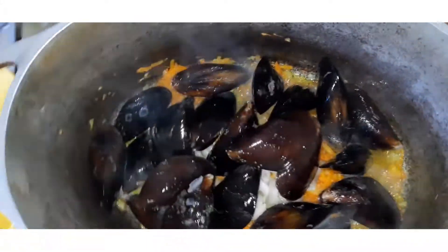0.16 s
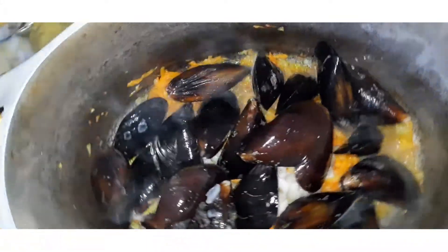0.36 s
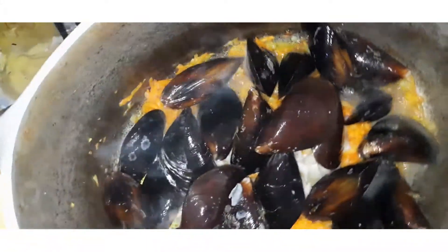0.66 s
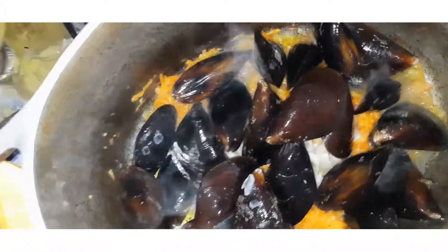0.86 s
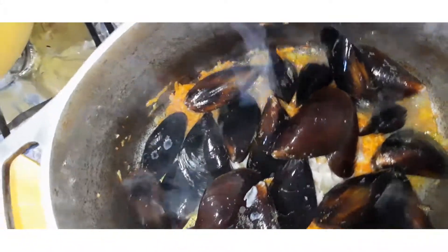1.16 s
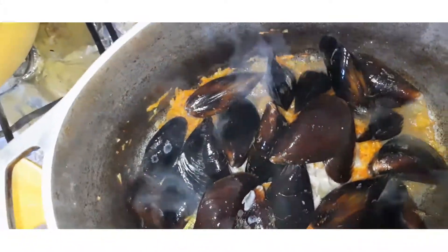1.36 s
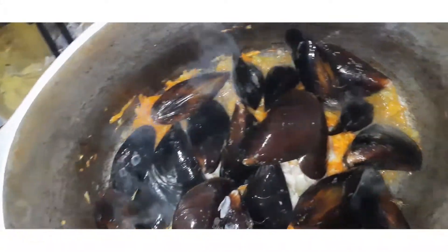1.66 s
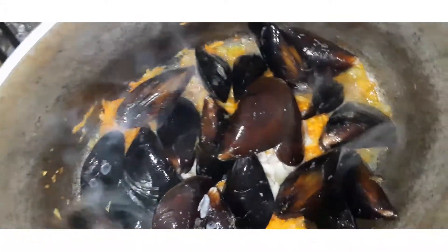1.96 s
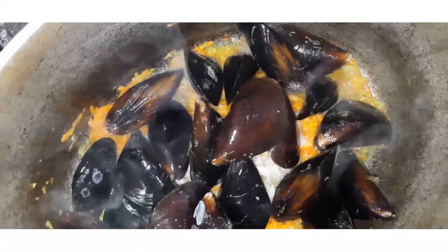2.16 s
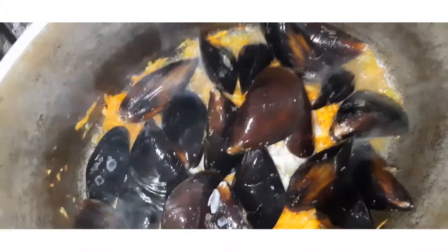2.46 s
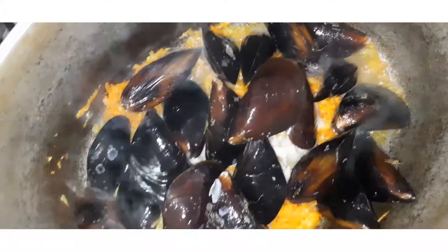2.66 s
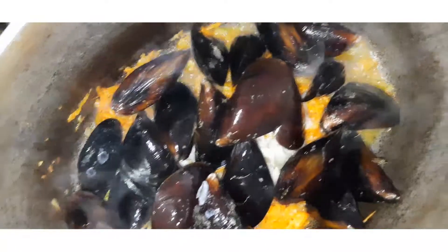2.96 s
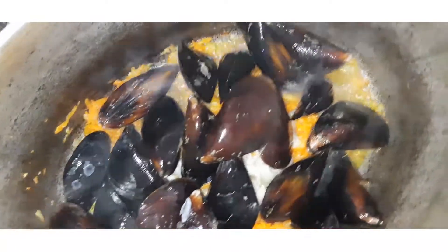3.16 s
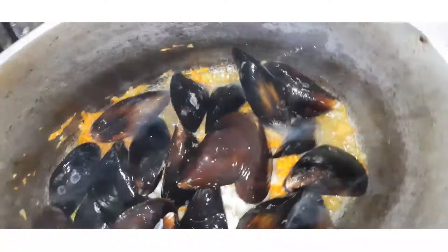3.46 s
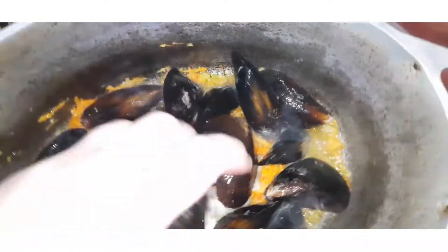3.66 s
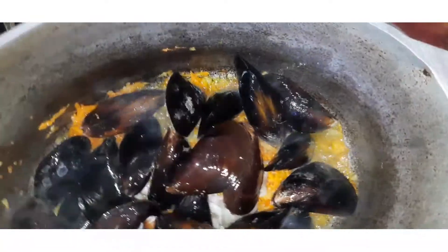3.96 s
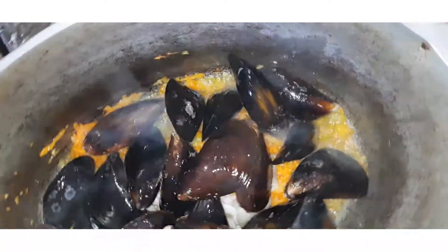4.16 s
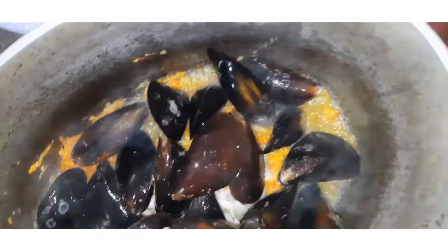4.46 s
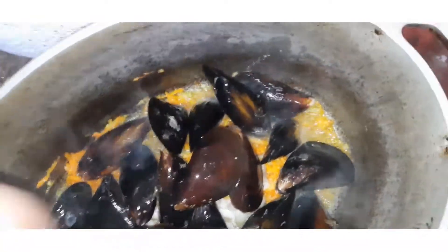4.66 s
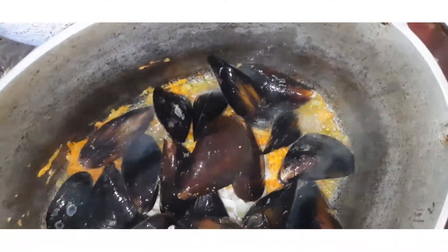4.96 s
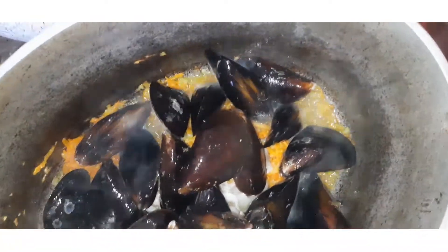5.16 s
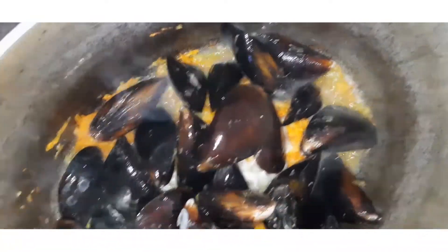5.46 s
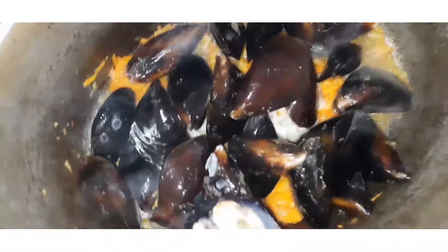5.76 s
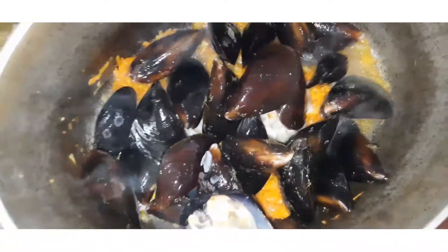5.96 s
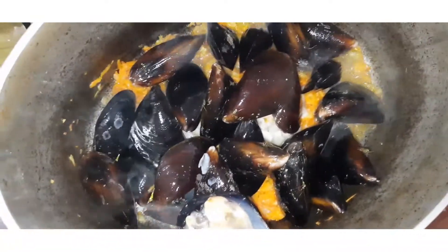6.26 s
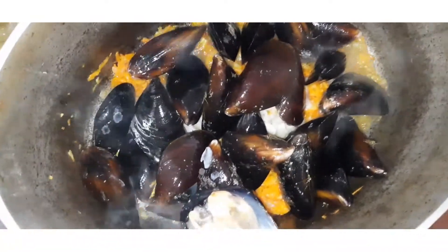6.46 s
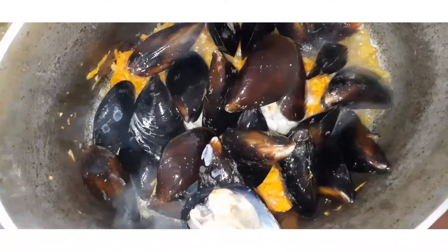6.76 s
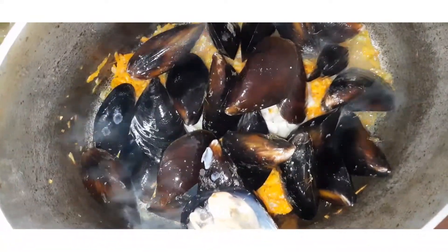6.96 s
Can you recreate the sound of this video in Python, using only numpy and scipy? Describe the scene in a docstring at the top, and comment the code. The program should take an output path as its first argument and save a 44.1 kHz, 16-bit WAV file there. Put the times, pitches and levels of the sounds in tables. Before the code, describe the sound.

Dense bright frying crackle swells slightly then holds, punctuated by sharp shell snaps, low knocks and shuffling beside the stove, and a brief metallic clink.

```python
"""Mussels frying in a deep pot

Mussels fry in hot oil in a deep metal pot, heard from just above the rim.
Random bubble bursts, thicker in each spurt of leaking juice, make crackle, hiss and fizz; clustered modes click as shells.
Beside the stove, pulses with rumble knock, swelling grains shuffle, and decaying modes clink as a utensil.
Low filtered noise is the gas flame underneath."""
import sys
import numpy as np
from scipy import signal
from scipy.fft import rfft, irfft
from scipy.io import wavfile

SR = 44100
rng = np.random.default_rng(int(sys.argv[2]) if len(sys.argv) > 2 else 0)


def store_wav(level_fs):
    """Save 16-bit WAV to argv[1]."""
    pcm = np.round(np.clip(np.atleast_2d(level_fs), -1, 1) * 32767)
    wavfile.write(sys.argv[1], SR, pcm.T.astype(np.int16))


N = 313110
TIME = np.arange(N) / SR  # s

# vigour of the frying, building up as the shells leak juice, then settling: (time [s], relative level [dB])
FRYING_VIGOUR = [(0, -27), (0.7, -25.5), (1.3, -24), (1.9, -22), (3.15, -22.5), (3.4, -23), (4.4, -22.5),
                 (6.2, -23), (7.1, -22.5)]
# colour of the sizzle out of the pot: (frequency [Hz], relative left [dB per Hz], relative right [dB per Hz])
SIZZLE_COLOUR = [(269, -24.5, -24), (540, -12, -12.5), (810, -6.5, -10.5), (1180, -13.7, -8),
                 (1513, -12, -9.5), (1970, -6.5, -1), (2820, -2, 2.5), (3810, -9.5, -9), (4430, -10, -7.5),
                 (6860, -14, -2.5), (8580, -12, -6.5), (9860, -12.5, -13.5), (11840, -9, -7.5),
                 (15700, -10.5, -13.5)]
# resonances of the pot that the sizzle keeps ringing: (frequency [Hz], width [Hz], relative level [dB])
POT_RESONANCES = [(1527, 187, 3), (2700, 6, -16)]
# brief dips in the level of the sizzle: (time [s], depth [dB])
SIZZLE_DIPS = [(2.51, 3.5), (5.12, 2.5), (6.25, 5)]
DIP_S = 0.02
BURSTS_PER_S, SPURTS_PER_S = 14000, 45
# the crackle of the bigger bubbles: level at mean vigour, share of the vigour's swing that it follows
CRACKLE_DB, CRACKLE_FOLLOWS = -26, 0.84

# shell clicks and spits of oil: (time [s], level [dB], pitch [Hz], t60 [s], left minus right [dB])
SHELL_CLICKS = [(1.342, -10, 2800, 0.034, -7), (1.343, -18, 890, 0.13, 5), (1.386, -18, 2700, .06, -6),
                (1.462, -17, 2910, 0.058, -5), (1.459, -19.5, 860, 0.048, 13),
                (1.817, -18.5, 2480, .05, -9), (3.447, -16, 7300, 0.02, -10),
                (3.7328, -4.5, 1300, 0.0033, -1), (3.747, -9.5, 2330, .008, -6),
                (3.758, -16.5, 950, 0.043, 0), (3.813, -16.5, 520, 0.018, -2),
                (4.826, -13, 2330, 0.016, -15), (4.84, -20, 1490, 0.069, -2), (5.432, -14.5, 2180, .03, -2),
                (6.223, -9.5, 2500, 0.018, 5)]

# the utensil touches down and rebounds: (time [s], strength [dB])
UTENSIL_TOUCHES = [(4.912, -13.5), (4.938, -28), (4.963, -26), (5.006, -29), (5.058, -33)]
# modes of the utensil: (frequency [Hz], relative level [dB], t60 [s])
UTENSIL_MODES = [(321, -20, 0.27), (776, -13.5, 0.2), (1200, -21, 0.35), (2050, -9, 0.16),
                 (2650, -14, 0.21), (2767, -10, 0.5), (2814, -8, 0.19), (3435, -11, 0.2), (3550, -12, .16),
                 (3800, -5, 0.046), (4100, -5, .06), (4400, -9, .06), (5740, -13, 0.055), (6030, 0, 0.063)]

# dull knocks: (time [s], level of the push [dB], pitch of the contact [Hz], share of ring and rumble [factor])
DULL_KNOCKS = [(0.492, -28, 330, 0.75), (0.727, -30, 400, 0.73), (1.345, -19.5, 274, 2.3),
               (1.460, -21, 300, 1.5), (1.486, -19, 236, 1.9), (1.570, -19.5, 203, 1.75),
               (1.817, -23.5, 447, 1.8), (2.1697, -2.5, 384, 0.61), (2.173, -19, 135, 1.2),
               (2.2281, -9, 380, 0.64), (2.905, -19, 390, .67), (3.163, -24.5, 300, 1.7),
               (3.294, -11, 493, 2.1), (3.301, -11, 326, .9), (3.317, -7, 280, 0.89),
               (3.331, -13, 480, 0.49), (3.346, -22, 135, 1.4), (3.360, -11, 367, 0.94),
               (4.108, -15.5, 280, 0.8), (5.186, -13.5, 620, 0.54), (5.369, -13, 422, 0.49),
               (5.433, -19.5, 420, 1.2), (5.707, -12, 427, 1.15), (5.765, -19, 378, 1.1),
               (6.045, -13.5, 480, 0.96), (6.083, -8, 427, 1.04), (6.861, -18, 424, 1.2),
               (6.957, -15.5, 322, 0.71), (7.026, -16, 272, 2), (7.071, -10.5, 360, 1.2)]
# what a knock sets ringing: (frequency [Hz], relative level [dB])
STRUCK_MODES = [(195, 4.5), (267, 11.5), (404, 5)]

# something is slid about beside the stove: (start [s], length [s], level [dB])
SLIDING = [(0.465, 0.29, -45.5), (1.4, 0.15, -34.5), (1.804, 0.54, -42.5), (2.58, .2, -46),
           (2.886, 0.23, -45), (5.137, 0.062, -36), (5.306, 0.21, -34), (5.668, 0.14, -30.5),
           (5.945, .17, -32.5), (6.365, 0.27, -45.5), (6.75, 0.25, -33)]
SLIDE_ATTACK_S, SLIDE_RELEASE_S, BUMPS_PER_S = 0.047, 0.051, 35
# the low murmur of the kitchen under the slides: its level at first, and once the frying has built up
QUIET_START_DB, QUIET_DB, QUIET_RISE_S = -48, -42.5, 1.4

# colour of knocks and shuffling in the kitchen: (frequency [Hz], relative level [dB per Hz])
KITCHEN_COLOUR = [(25, -50), (60, -19.5), (120, -5.5), (220, -9.5), (300, -7.5), (500, 4), (800, 0),
                  (1200, -9), (2500, -12), (6000, -73)]
# low resonances around the stove: (frequency [Hz], width [Hz], relative level [dB])
STOVE_BOOMS = [(200, 10, -2), (267.4, 14.7, 12), (403.3, 15, 3)]
KITCHEN_T60_S = 0.4

# the gas flame under the pot is steady and flutters once
FLAME_DB, FLUTTER_S, FLUTTER_LENGTH_S, FLUTTER_DB = -60, 4.85, 0.037, -47
CUTOFF_HZ = 15780


def sizzle(hiss_db=3.0, finest_db=-1.0, ping_db=-8.5):
    """Big bubbles crackle, small ones hiss, the finest spray fizzes on top; each size has its own spurts."""
    hz, left_db, right_db = np.transpose(SIZZLE_COLOUR)
    ringing = from_db(ping_db) * pings()

    def band(burst, edges_hz):
        """One size of bubble, with the pings in its range, coloured for each ear."""
        band_pass = signal.butter(6, edges_hz, "band", fs=SR, output="sos")
        left, right = signal.sosfilt(band_pass, burst + ringing)
        return np.array([colour(left, hz, left_db), colour(right, hz, right_db)])

    big = bubbles(spread_db=3.5, spurt_depth=0.16, pot_echo_db=-2.0)
    crackle = band(big + resonate(big[0], POT_RESONANCES), [200, 3400])

    small = bubbles(spread_db=3.5, spurt_depth=0.28, pot_echo_db=-1.0)
    finest = bubbles(spread_db=5.5, spurt_depth=0.26, pot_echo_db=1.5)
    hiss = band(small, [3400, 9000]) + from_db(finest_db) * band(finest, [9000, 19000])

    vigour_db, = in_time(FRYING_VIGOUR)
    crackle_db = CRACKLE_DB + CRACKLE_FOLLOWS * (vigour_db - vigour_db.mean())
    return from_db(hiss_db + vigour_db) * rms_one(hiss) + from_db(crackle_db) * rms_one(crackle)


def bubbles(spread_db, spurt_depth, pot_echo_db):
    """Bursting bubbles, thicker in each spurt; the pot's walls scatter each burst in a different way."""
    bursts_per_s = BURSTS_PER_S * spurts(spurt_depth, t60=0.075)
    direct = grains(bursts_per_s, spread_db, lag_ms=0.45)
    fade = dying(t60=0.022)[1]
    lingering_power = np.abs(signal.oaconvolve(direct[0] ** 2, fade / fade.sum())[:N])
    scattered = np.sqrt(lingering_power) * rng.standard_normal((2, N))
    return rms_one(direct + from_db(pot_echo_db) * scattered)


def spurts(depth, t60):
    """Each drop of juice that meets the oil flares up at once and dies away; mean 1."""
    drops = (rng.random(N) < SPURTS_PER_S / SR) * rng.exponential(1, N)
    flare = signal.fftconvolve(drops, dying(t60)[1])[:N]
    flow = 1 + depth * np.maximum(flare, 0) / flare.mean()
    return flow / flow.mean()


def pings(t60=0.089, spread_db=1.0, count=4200):
    """Some bubbles ring briefly in the hollow of a shell, each at a pitch of its own; rms 1."""
    t, fade = dying(t60)
    when, pitch, size, phase = rng.random((4, count, 1), dtype=np.float32)
    at = ((when * N).astype(int) + np.arange(len(t))).ravel()
    # pitches spread over the decade from 1400 Hz
    turn = 2 * np.pi * 1400 * 10 ** pitch * t.astype(np.float32)
    strength = from_db(-spread_db * np.log(size + 1e-9)) * fade
    # the ears hear each ping at a different phase
    ears = [np.sin(turn + lag) * strength for lag in (0, 2 * np.pi * phase)]
    return rms_one(np.array([np.bincount(at, ear.ravel(), N)[:N] for ear in ears]))


def shell_clicks(crack_db=-13, room_db=-9, cluster=0.11, count=5):
    """A short crack, then a cluster of close, quickly damped modes that builds up within a cycle."""
    out = np.zeros((2, N))
    for s, db, hz, t60, pan_db in SHELL_CLICKS:
        t, fade = dying(t60)
        offsets = np.linspace(-1, 1, count) + rng.uniform(-0.35, 0.77, count)
        modes_hz = hz * (1 + cluster * offsets)
        phases = rng.uniform(-1.77, 2.4, (count, 1))
        ring = np.cos(2 * np.pi * np.outer(modes_hz, t) + phases).sum(axis=0) / np.sqrt(count)
        build_up = 1 - np.exp(-2 * hz * t)
        # the crack dies three times as fast as the ring
        crack = from_db(crack_db) * rng.standard_normal((2, len(t))) * fade ** 3
        add(out, s, (ring * fade * build_up + crack) * from_db(db) * pan(pan_db))
    return out + from_db(room_db) * reverberate(out, t60=0.12)


def clink(room_db=-5, crack_db=2, crack_t60=0.05, pan_db=-5.0):
    """A hard touch and a few light rebounds: each cracks and sets the utensil's modes ringing."""
    out = np.zeros((2, N))
    crack_fade = dying(crack_t60)[1]
    for s, blow_db in UTENSIL_TOUCHES:
        noise = crack_fade * rng.standard_normal((2, len(crack_fade)))
        crack = resonate(resonate(noise, [(4000, 2400, 0)]), [(4000, 4300, 0)])
        add(out, s, from_db(blow_db + crack_db) * crack)
        for hz, db, t60 in UTENSIL_MODES:
            t, fade = dying(t60)
            phases = rng.uniform(-0.61, 1, (2, 1))
            build_up = 1 - np.exp(-hz * t)
            ring = np.cos(2 * np.pi * hz * t + phases) * build_up
            add(out, s, from_db(blow_db + db) * fade * ring)
    return (out + from_db(room_db) * reverberate(out, KITCHEN_T60_S)) * pan(pan_db)


def knocks(rumble_db=-7.0, rumble_t60=0.4, contact_db=-1.0, ring_db=-18.5, ring_t60=0.29,
           uneven_db=2.5, mismatch_db_per_octave=16, rattle_db=-10, rattle_hz=2000):
    """A soft blow pushes air and rebounds; modes near its pitch ring, the room rumbles, shells rattle faintly."""
    direct, rumble = np.zeros(N), np.zeros((2, N))
    lead = 0.005  # s from the start of the pulse to its peak
    t, fade = np.arange(-lead, lead, 1 / SR), dying(rumble_t60)[1]
    after, ring = dying(ring_t60)
    modes_hz, modes_db = np.transpose(STRUCK_MODES)
    modes = ring * np.sin(2 * np.pi * np.outer(modes_hz, after))
    for s, db, hz, share in DULL_KNOCKS:
        u = (np.pi * hz * t) ** 2
        push = (2 * u - 1) * np.exp(-u)
        add(direct, s - lead, from_db(db) * push)

        # modes far from the contact's pitch are excited less
        mismatch_db = mismatch_db_per_octave * np.abs(np.log2(modes_hz / hz))
        excited_db = modes_db - mismatch_db + uneven_db * rng.standard_normal(len(modes))
        add(direct, s, share * from_db(db + ring_db + excited_db) @ modes)

        scatter = rng.standard_normal((2, len(fade)))
        scatter = scatter + resonate(scatter, [(hz, hz, contact_db)])
        add(rumble, s, from_db(db + rumble_db) * share * fade * scatter)
    rattle = from_db(rattle_db) * resonate(rumble, [(rattle_hz, 1600, 0)])
    return direct + low_room(rumble, width=0.53) + rattle


def shuffling(body_hz=270, body_width_hz=100, body_db=3, bump_db=-4):
    """Dense slips on a hollow body, heard through the room; each slide swells them and adds bumps."""
    def through_body(touches):
        """The hollow body and then the room ring with the touches; rms 1."""
        body = resonate(touches, [(body_hz, body_width_hz, body_db)])
        return rms_one(low_room(touches + body, width=0.54))

    shared = [[1], [0]]  # keeps one channel of grains as the part common to both ears
    noise = 0.47 * rng.standard_normal((2, N))
    slips = through_body(grains(900, spread_db=1.5, lag_ms=0.2) * shared + noise)
    bumps = through_body(grains(BUMPS_PER_S, spread_db=1.5, lag_ms=0.2) * shared)
    effort = sum(from_db(db) * swell(s, length, SLIDE_ATTACK_S, SLIDE_RELEASE_S)
                 for s, length, db in SLIDING)
    quiet = from_db(np.interp(TIME, [0, QUIET_RISE_S], [QUIET_START_DB, QUIET_DB]))
    return (quiet + effort) * slips + from_db(bump_db) * effort * bumps


def low_room(x, width):
    """The kitchen's dull boom for a (shared, differing) pair; long waves reach both ears nearly alike."""
    x = x[0] + width * x[1] * np.array([[1], [-1]])
    return colour(x + resonate(x, STOVE_BOOMS), *np.transpose(KITCHEN_COLOUR))


def flame(centre_hz=62, width_hz=45, side_db=-7):
    """The burning gas is noise through two low resonances: a soft roar, nearly alike at both ears."""
    roar = resonate(rng.standard_normal((2, N)), [(centre_hz, width_hz, 0)])
    mid, side = resonate(roar, [(centre_hz, 4 * width_hz, 0)])
    flutter = swell(FLUTTER_S, FLUTTER_LENGTH_S, attack_s=0.015, release_s=0.025)
    level = from_db(FLAME_DB) + from_db(FLUTTER_DB) * flutter
    return level * rms_one(mid + from_db(side_db) * side * np.array([[1], [-1]]))


def grains(per_s, spread_db, lag_ms):
    """Random clicks of uneven size, each from its own place and so with its own lag between the ears."""
    at = np.flatnonzero(rng.random(N) < per_s / SR)
    sizes = from_db(spread_db * np.minimum(rng.exponential(1, len(at)), 4.4))  # the biggest are capped
    sizes = sizes * rng.choice([-1, 1], len(at))
    lags = np.round(rng.uniform(-1, 1, len(at)) * lag_ms * SR / 1000).astype(int)
    return rms_one(np.array([np.bincount(at, sizes, N), np.bincount((at + lags) % N, sizes, N)]))


def resonate(x, modes):
    """Parallel two-pole resonances: (frequency [Hz], width [Hz], level [dB])."""
    out = 0
    for hz, width, db in modes:
        r = np.exp(-np.pi * width / SR)
        zeros = [(1 - r * r) / 2, 0, (r * r - 1) / 2]
        poles = [1, -2 * r * np.cos(2 * np.pi * hz / SR), r * r]
        out = out + from_db(db) * signal.lfilter(zeros, poles, x + 1e-18)
    return out


def colour(x, hz, db):
    """Causal (minimum-phase) filter with the given spectrum."""
    size = 8192
    grid = np.fft.rfftfreq(size, 1 / SR)
    cepstrum = irfft(np.log(from_db(np.interp(np.log(grid + 1), np.log(hz), db))))
    # folding the cepstrum onto positive time makes the phase minimal
    cepstrum[1:size // 2] *= 2
    cepstrum[size // 2 + 1:] = 0
    response = irfft(np.exp(rfft(cepstrum)))[:size // 2]
    return signal.oaconvolve(x, response if x.ndim == 1 else response[None], axes=-1)[..., :N]


def reverberate(x, t60):
    """Diffuse reflections of unit energy, different at each ear."""
    t, fade = dying(t60)
    tail = rng.standard_normal((2, len(t))) * fade
    tail = tail / np.sqrt(np.sum(tail ** 2) / 2)
    return signal.fftconvolve(np.atleast_2d(x), tail, axes=-1)[:, :N]


def swell(s, length, attack_s, release_s):
    """Rises from time s, starts dying away once its length has passed; top 1 if the rise completes."""
    rise = np.clip((TIME - s) / attack_s, 0, 1)
    return rise * np.exp(-np.clip((TIME - s - length) / release_s, 0, 20))


def dying(t60):
    """Time axis and envelope of a ring that falls 60 dB in t60 seconds."""
    t = np.arange(int(t60 * SR) + 2) / SR
    return t, from_db(-60 * t / t60)


def pan(db):
    """Gains of the two ears for a left-minus-right difference in dB."""
    return from_db(np.array([[db], [-db]]) / 2)


def add(out, s, sound):
    """Mix a sound in at time s."""
    start = int(s * SR)
    part = sound[..., :max(N - start, 0)]
    out[..., start:start + part.shape[-1]] += part


def in_time(rows):
    """Each column of a curve, sample by sample."""
    s, *columns = np.transpose(rows)
    return [np.interp(TIME, s, c) for c in columns]


def from_db(db):
    """Amplitude factor of a level in dB."""
    return 10 ** (np.asarray(db) / 20)


def rms_one(x):
    """Scale to an rms of 1."""
    return x / np.sqrt(np.mean(x ** 2) + 1e-20)


def scene():
    """Sizzle with its brief dips, shell clicks, utensil, knocks, shuffling and flame together."""
    dip_db = sum(depth * np.exp(-((TIME - s) / DIP_S) ** 2) for s, depth in SIZZLE_DIPS)
    frying = sizzle() * from_db(-dip_db)
    return frying + shell_clicks() + clink() + knocks() + shuffling() + flame()


def record(dry, low_cut_hz=50):
    """The deepest bass is cut, peaks stop at full scale, the top is cut."""
    low_cut = signal.butter(2, low_cut_hz, "high", fs=SR, output="sos")
    top_cut = signal.ellip(12, 0.1, 80, CUTOFF_HZ, fs=SR, output="sos")
    lean = signal.sosfilt(low_cut, dry)
    return signal.sosfilt(top_cut, np.clip(lean, -1, 1))


dry = scene()
out = record(dry)
store_wav(out)
```